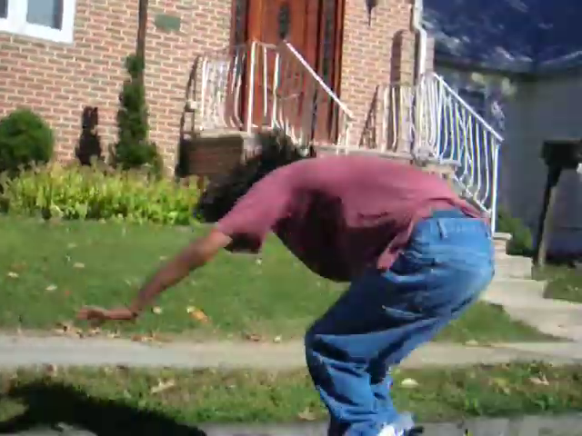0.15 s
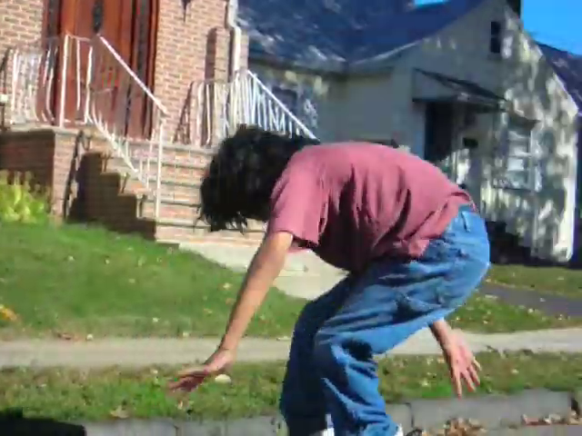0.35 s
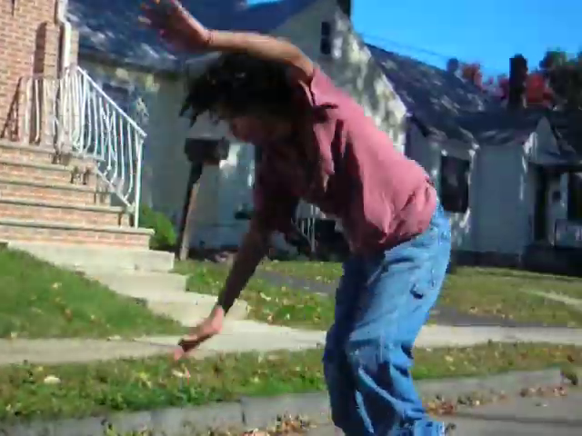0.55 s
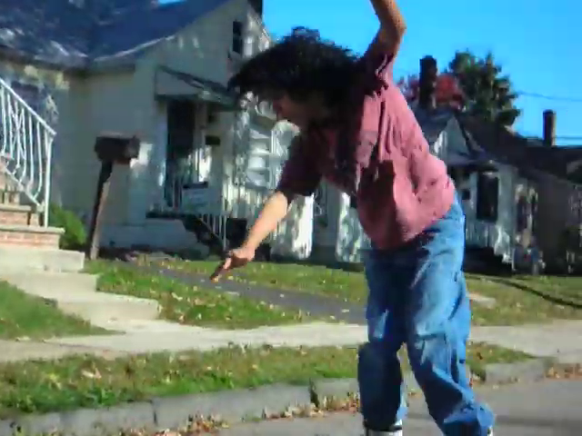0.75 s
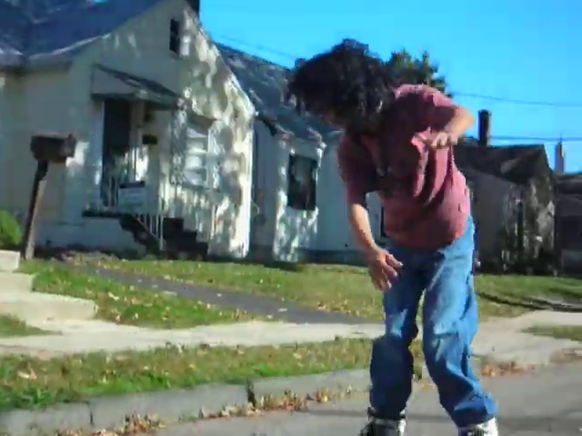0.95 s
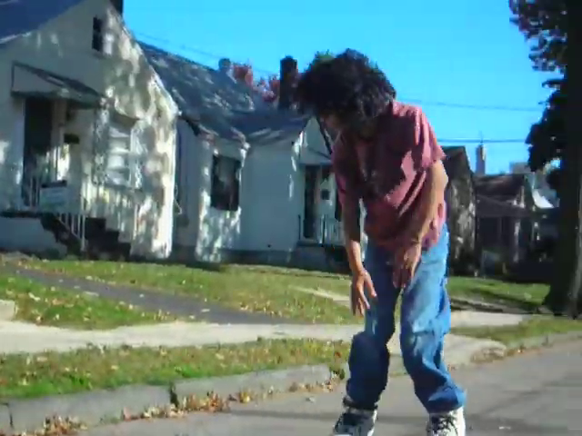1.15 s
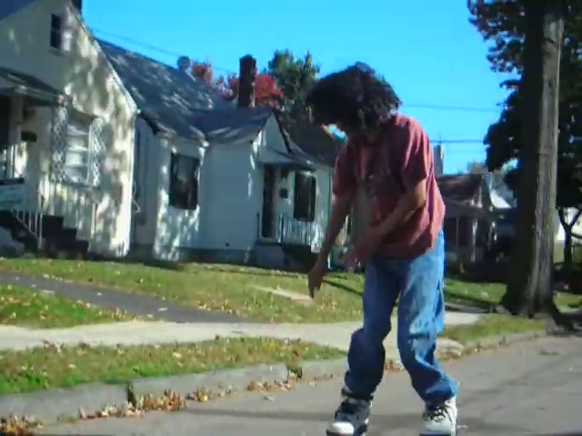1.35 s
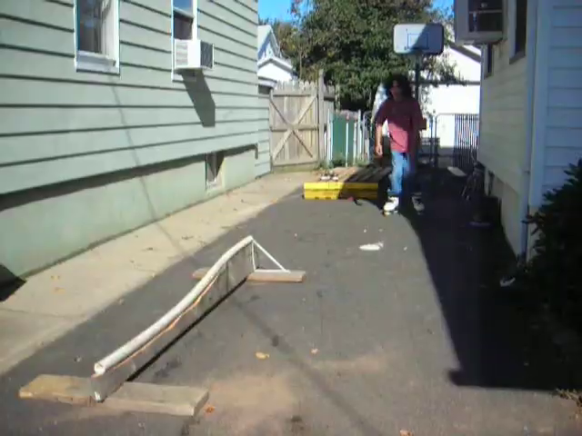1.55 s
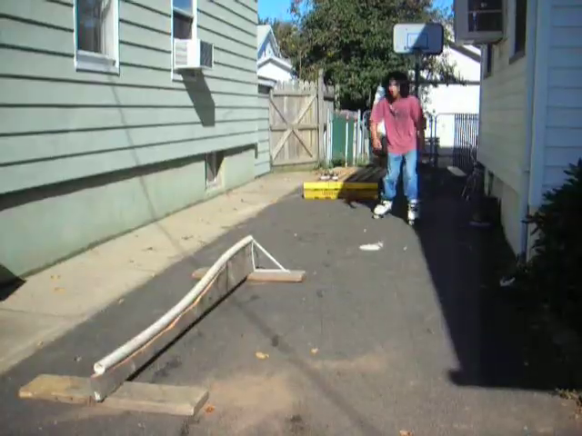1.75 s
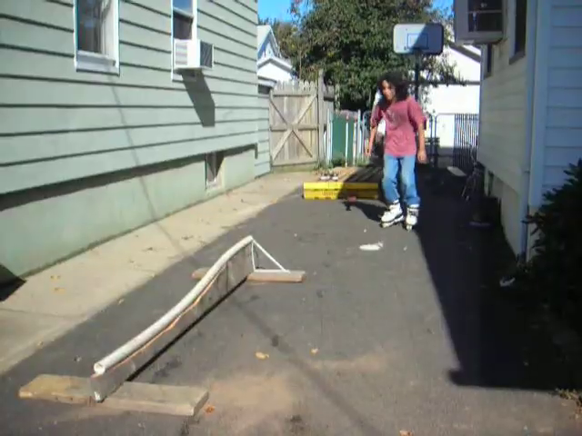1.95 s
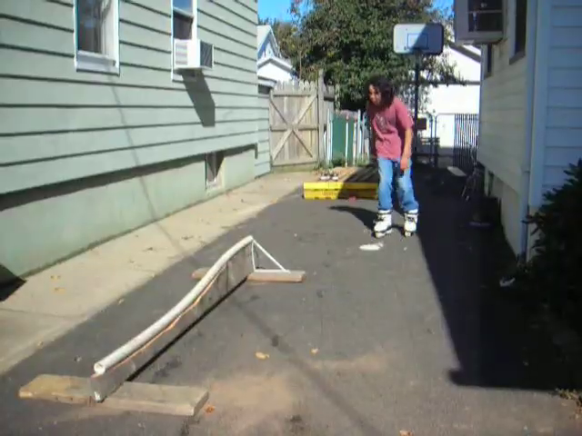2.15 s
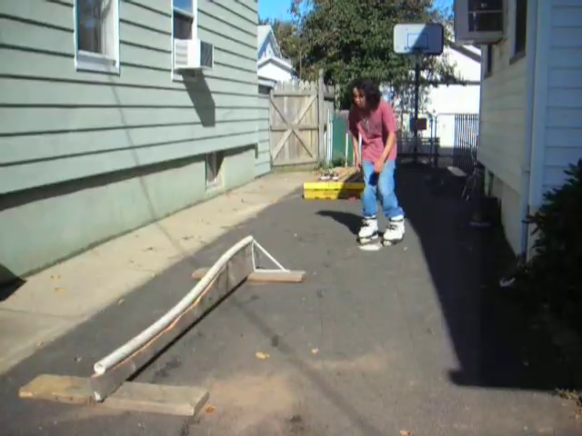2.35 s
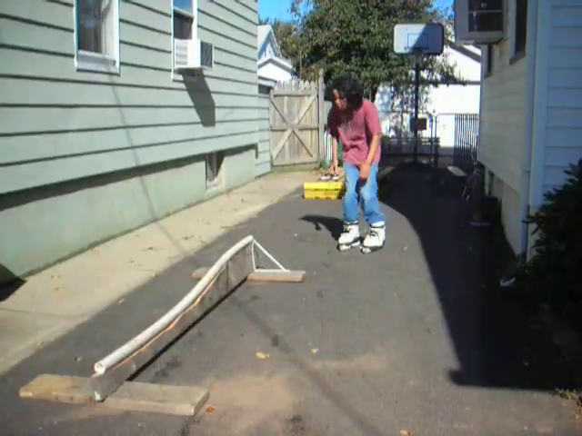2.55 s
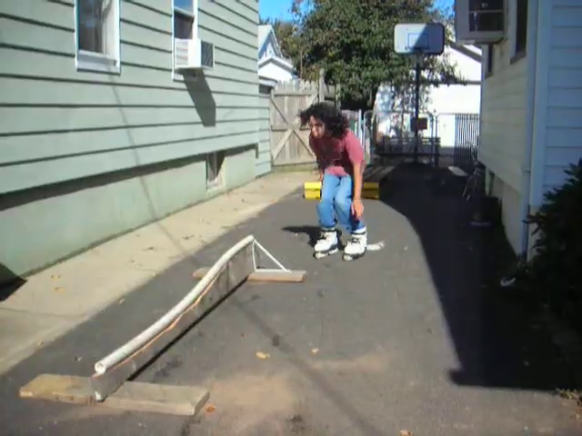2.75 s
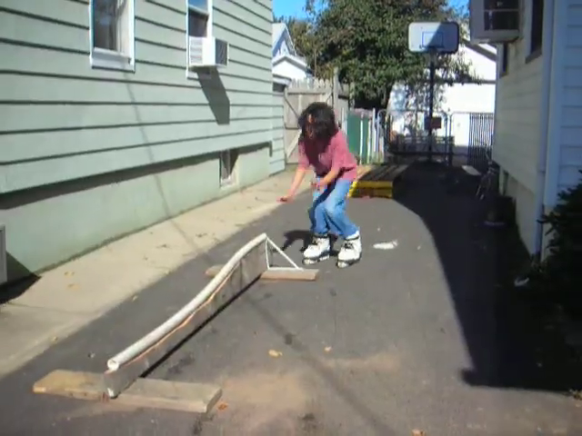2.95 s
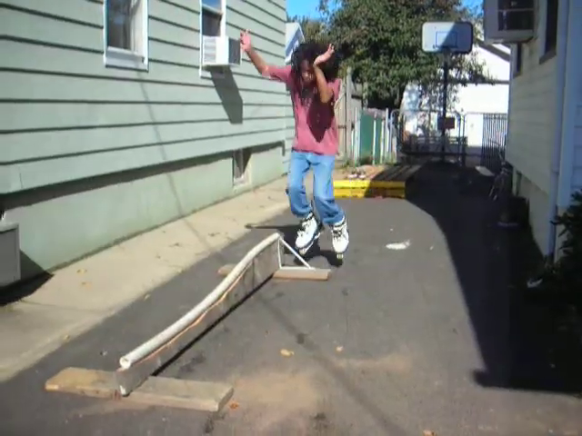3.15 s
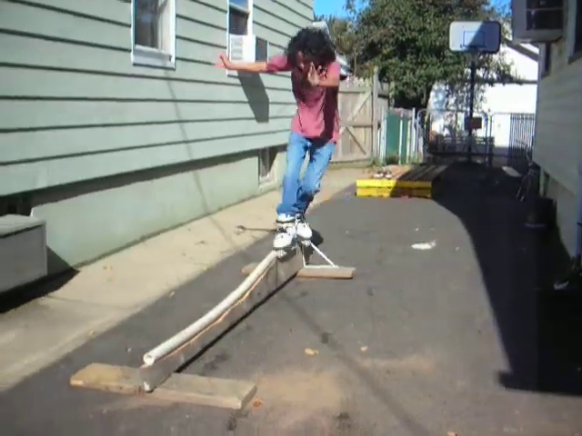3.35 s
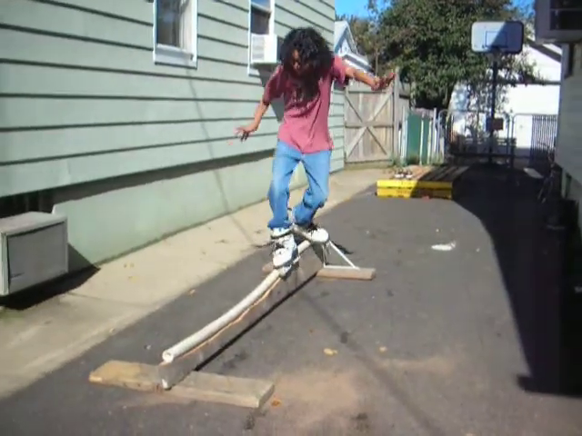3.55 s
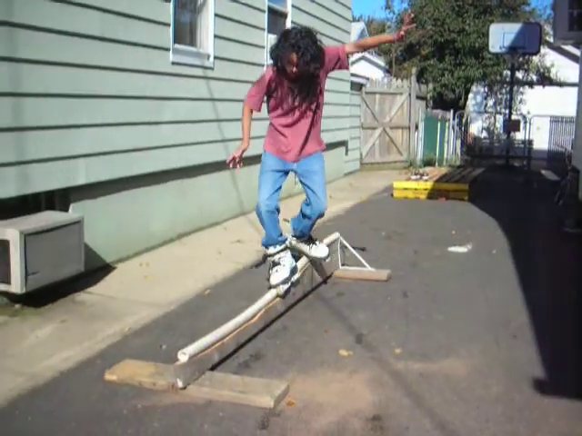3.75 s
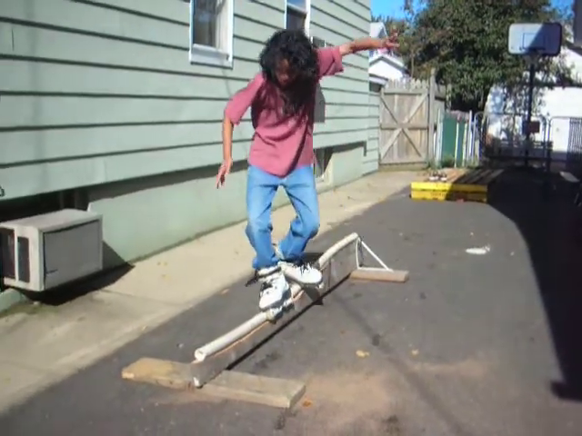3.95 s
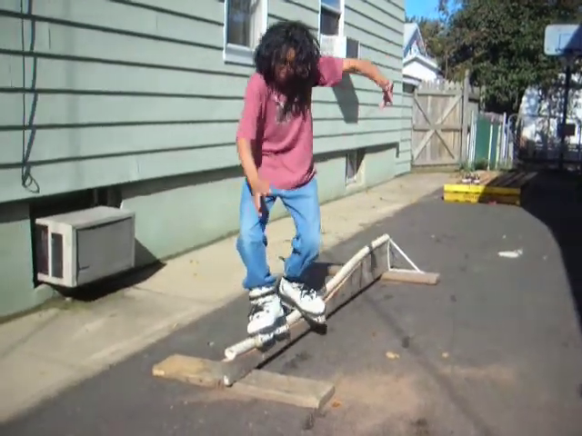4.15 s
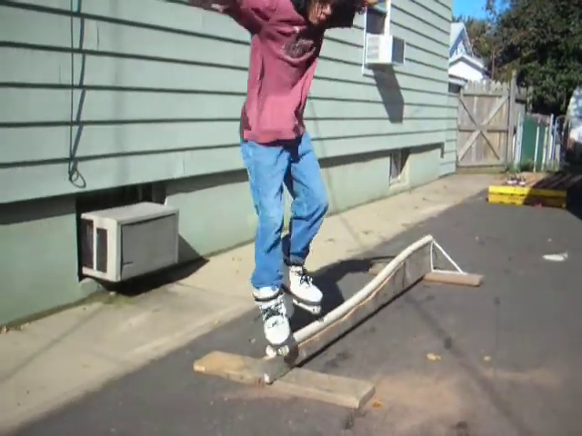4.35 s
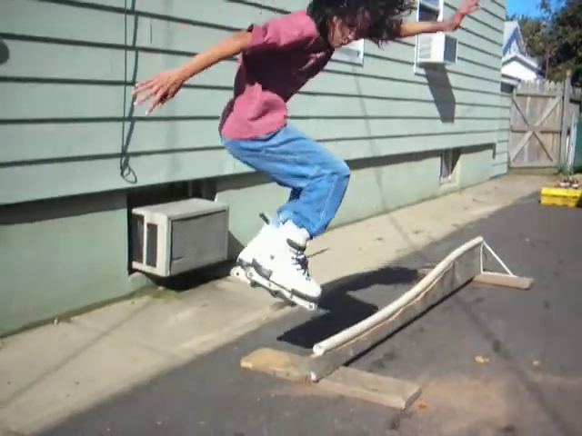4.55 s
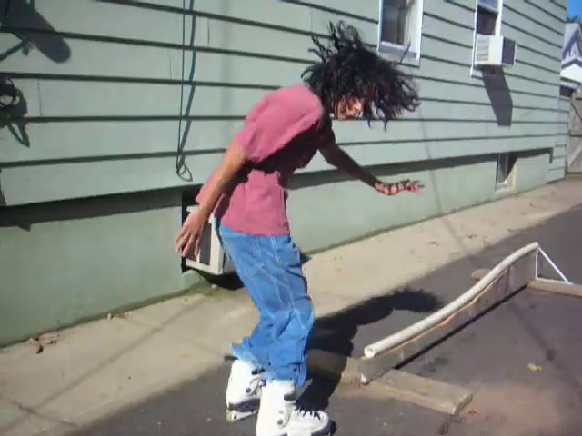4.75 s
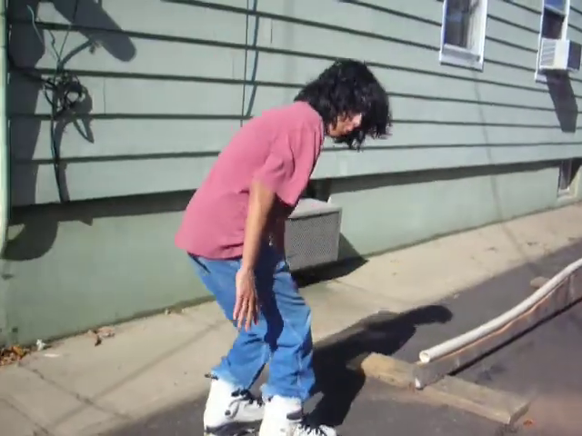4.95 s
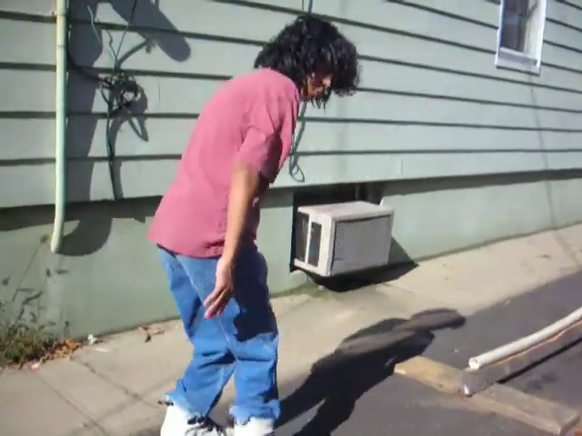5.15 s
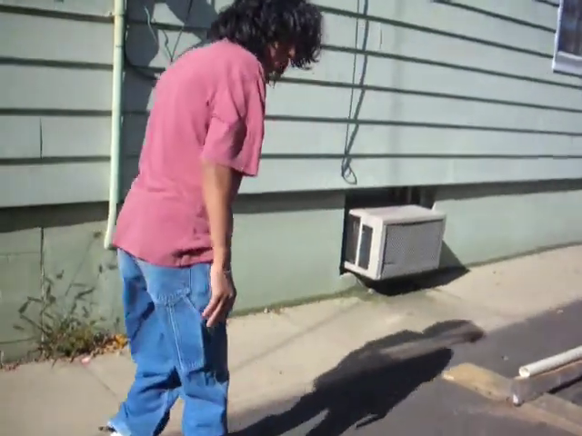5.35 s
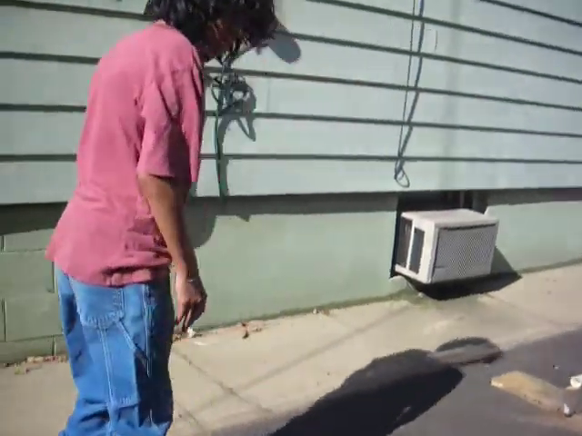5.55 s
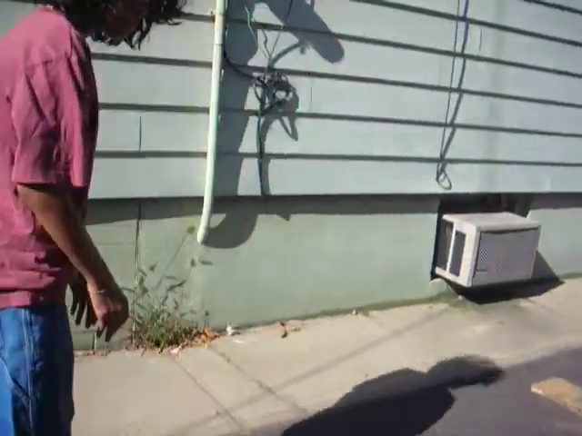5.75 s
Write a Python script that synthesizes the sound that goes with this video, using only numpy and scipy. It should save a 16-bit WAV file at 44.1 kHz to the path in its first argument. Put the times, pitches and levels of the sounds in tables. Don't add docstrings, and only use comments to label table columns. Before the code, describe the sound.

Inline skates hit a rough street at once with a tight, distorted clatter, then coast quietly with small stone ticks. From about 0.5 s the gritty rolling swells, with a sharp snap at 0.88 and a hard double clack at 1.08. It softens as the skater slows, with a dull knock near 1.25, a bright snap at 1.52 and a hard stop at 1.65. Around 1.7 the place changes to a paved yard between houses; wheels roll steadily closer until 3.1, then fade for the jump. A dense clack cluster at 3.32 starts a faint, hollow plastic scrape on a ringing rail, rising around 4.1. Snaps at 4.3 and 4.5 end it. After a short lull, a loud triple touchdown at 4.75 echoes off walls, and gritty rolling grows past the microphone, with a strong tick at 5.63. The sound is midrange, narrow and clipped on the blows.

```python
import sys
import numpy as np
from scipy import signal
from scipy.fft import rfft, irfft, next_fast_len
from scipy.io import wavfile
from scipy.ndimage import uniform_filter1d

SR = 44100
rng = np.random.default_rng(int(sys.argv[2]) if len(sys.argv) > 2 else 0)


def generate_wav(signal):
    frames = np.transpose(np.atleast_2d(signal))
    scaled = np.clip(frames, -1, 1) * 32767
    pcm = np.round(scaled).astype(np.int16)
    wavfile.write(sys.argv[1], SR, pcm)


def volts_from_decibels(level):
    exponent = np.asarray(level, float) / 20
    return 10 ** exponent


N = 259749

# frequency in Hz, gain in dB.
MIC_BAND = [(20, -22), (120, 1), (3300, 0), (3700, -6), (4000, -13), (4250, -19.5), (4500, -40),
            (4800, -73.5), (20000, -110)]
# frequency in Hz, gain in dB.
AIR_COLOUR = [(18, -37), (30, -15), (41, -20), (54, -33), (398, -30.5), (904, -24), (2790, -34),
              (4040, -32.5), (5250, -79.5), (8890, -120)]

# start in seconds, peak level in dB, ring in Hz, time to fade by 60 dB in seconds.
THUMPS = [(0.0587, -4, 408, 0.021), (0.534, -22.5, 200, 0.047), (0.98, -11, 104.9, 0.018),
          (1.076, -23, 93.3, 0.026), (1.2551, -1, 178.3, 0.0079), (1.519, -31.5, 88, 0.11),
          (2.183, -31, 207, .08), (2.381, -31, 193, 0.22), (3.327, -19, 330, 0.086),
          (4.312, -19, 350, 0.11), (4.744, -8.5, 322, 0.024)]
# start in seconds,
# peak level in dB, ring in Hz, crack level in dB, time to fade by 60 dB in seconds.
STREET_CLACKS = [
    (.043, -5, 1857, -1, .022),
    (.047, -3, 1150, -4, .035),
    (.06, -18, 1700, 0, .03),
    (1.0756, 5.5, 3090, -12, .011),
    (1.0784, 5, 2830, -11, .008),
    (1.2555, -14, 447, -6, .014),
    (1.523, -10, 3240, -4, .02),
    (1.53, -10.5, 2890, 2.5, .008),
    (1.641, -16, 591, 2.5, .026),
    (1.6513, 1.5, 360, -6, .016),
]
YARD_CLACKS = [(1.746, -11, 2510, -1.5, 0.018), (1.759, -17, 2170, -5.5, .03), (3.321, -4, 1060, -4, 0.043),
               (3.322, -2.5, 2900, -1, 0.017), (3.3245, 2.5, 2133, -5.5, 0.02),
               (3.331, -10.5, 754, -3, 0.11), (3.3619, -5.5, 2650, -10, 0.035),
               (3.366, -11, 2750, -5, 0.051), (3.376, -16, 633, 1, 0.057), (3.409, -12, 2590, 2, 0.041),
               (4.029, -28.5, 904, 4, 0.063), (4.075, -13, 772, -5.5, 0.064), (4.162, -25.5, 804, 2, .13),
               (4.3002, -6.5, 2454, -1, 0.016), (4.308, -9.5, 918, 0.3, 0.063),
               (4.504, -17.5, 1200, 3, 0.052), (4.512, -17, 880, -7, 0.017), (4.754, -10.5, 1110, 3, 0.019),
               (4.761, -15.5, 1680, -6, 0.064)]
# start in seconds,
# peak level in dB, ring in Hz, crack level in dB, time to fade by 60 dB in seconds.
SNAPS = [
    (.0418, -1.5, 730, -7, .016),
    (.0577, -4.5, 1700, -6, .02),
    (.8772, 6, 2900, -20, .008),
    (1.5215, 2.5, 3240, -14, .01),
    (4.3044, 4, 1600, -20, .009),
    (4.5006, 8, 826, -18, .017),
    (4.7394, 1.5, 1600, -9, .024),
    (4.7457, -.6, 900, -7, .02),
    (4.7519, 4.5, 1500, -14, .012),
]
# start in seconds, peak level in dB, ring in Hz.
STREET_TICKS = [(.099, -47, 1580), (.12, -18.5, 1690), (0.224, -28, 1660), (0.341, -24, 1200),
                (0.362, -19, 1640), (0.392, -11.5, 2790), (.411, -18, 1300), (0.43, -22, 1570),
                (.465, -18.5, 2200), (.494, -14, 1840), (0.541, -10.5, 1680), (0.553, -7, 2210),
                (0.908, -15, 2330), (0.948, -9, 1702), (.981, -4, 1775), (1.028, -18, 1705),
                (1.215, -13, 1700), (1.303, -20, 1630), (1.334, -14, 1695), (1.442, -3.5, 2500),
                (1.494, -8, 1714), (1.551, -22, 2080)]
YARD_TICKS = [(1.948, -20, 1790), (2.047, -18.5, 1720), (2.116, -19.5, 2280), (2.508, -13.5, 1610),
              (3.073, -28.5, 2350), (3.838, -26.5, 1230), (3.974, -31, 2570), (4.391, -24, 2395),
              (4.936, -22, 2650), (4.965, -25, 1310), (5.019, -24.5, 1350), (5.098, -22.5, 1690),
              (5.198, -13.5, 1370), (5.633, 0, 1740), (5.68, -20.5, 1650), (5.726, -10, 2850),
              (5.731, -9.5, 2110)]

# frequency in Hz, width in Hz, level in dB.
STREET = [
    [(1240, 490, -9.5), (1690, 190, 8), (2100, 150, -7)],
    [(119, 160, -8.5), (200, 150, 5.5), (330, 410, 1)],
    [(545, 227, -5.5), (870, 140, 1.2), (1140, 410, 0.6)],
    [(2350, 410, -0.5), (2750, 380, -1), (3050, 450, 0), (3440, 1100, -5.5)],
]
RUN_UP = [
    [(1310, 140, -13.5), (1680, 95, 4), (1870, 860, -4.5)],
    [(110, 180, -15.5), (187, 26, 1), (332, 31, -1)],
    [(576, 256, -4), (840, 190, -2.3), (1172, 183, -1)],
    [(2193, 240, -5), (2633, 740, 2), (3050, 730, 0.5), (4040, 1400, -9)],
]
RUN_OUT = [
    [(1350, 50, -8), (1682, 170, 1), (2015, 430, -6.2)],
    [(132, 100, -11.5), (246, 114, -4), (358, 104, -5)],
    [(723, 160, -6), (834, 49, 1.5), (1200, 400, -3)],
    [(2320, 910, 8.5), (2900, 2140, 5.5), (3280, 280, -17), (3800, 420, -2.5)],
]
# wheel ring, rumble, frames and grit, in dB.
STREET_MIX = (-4, -10, -8.5, -5)
SLOWING_MIX = (-4.5, -11, -9, -2.5)
RUN_UP_MIX = (-2.5, -12.5, -8, -3.5)
RUN_OUT_MIX = (-5, -13.5, -4, -8)
ROLL_EXTRA = (-0.033, -.1, -.15, 0.18)

# time in seconds, level in dB.
BEFORE_LANDING = [(0.0, -34), (0.018, -41.5)]
COASTING = [(0.078, -39.5), (0.136, -29), (0.212, -42), (0.22, -36), (0.402, -31.5), (0.44, -29.5)]
ROUGH_PATCH = [(0.472, -26.5), (0.55, -15), (0.578, -19.5), (0.736, -14.5), (0.754, -18.5), (0.838, -16),
               (0.936, -23), (1.053, -18)]
SLOWING = [(1.092, -30), (1.096, -37.5), (1.192, -32.5), (1.262, -24), (1.286, -27.5), (1.446, -22.5),
           (1.478, -29.5), (1.51, -24.5)]
STOPPING = [
    [(1.54, -29), (1.602, -27), (1.62, -32)],
    [(1.672, -27.5), (1.7, -34), (1.722, -27.5)],
]
PUSH_OFF = [(1.755, -22), (1.937, -29), (1.953, -24), (1.985, -30), (2.093, -28)]
APPROACH = [(2.126, -21.5), (2.596, -21), (2.618, -23), (2.834, -20), (3.062, -24.5), (3.076, -22),
            (3.114, -33), (3.274, -42), (3.298, -39)]
TOUCH_DOWN = [(4.79, -27.5), (4.878, -45), (5.032, -33.5), (5.088, -40), (5.114, -28.5), (5.174, -31.5)]
ROLL_PAST = [(5.206, -22.5), (5.284, -21), (5.306, -23.5), (5.436, -18), (5.57, -14), (5.612, -19.5),
             (5.848, -13), (5.89, -19.5)]
STREET_STEADY = [1.2, .9, .65, .45, .9, .9]
RUN_UP_STEADY = [.9, 1.1]
RUN_OUT_STEADY = [.7, .8]

# frequency in Hz, width in Hz, level in dB.
PLANK = [(642, 140, -3.5), (856, 200, -2.5), (1270, 100, -5)]
RAIL_LOW = [(200, 230, -14), (354, 210, -6.5)]
RAIL_MIDDLE = [(1300, 470, -5), (1700, 670, 4), (2210, 400, -4)]
RAIL_TOP = [(2260, 250, -3), (2650, 440, -1.5), (3260, 600, -1.5), (3580, 670, -2.5)]
# plank, low, middle and top scrape, in dB.
RAIL_MIX = (-2, -13, -7, -3.5)
RAIL_EXTRA = (0.12, -0.13, 0.086, -0.015)
# time in seconds, level in dB.
LOCK_ON = [(3.338, -14), (3.356, -25), (3.366, -14), (3.395, -18.5), (3.412, -18), (3.43, -30.5)]
RAIL_RINGS = [(3.462, -32.5), (3.542, -33.5), (3.558, -38.5), (3.644, -42), (3.66, -39)]
SLIDE = [(3.69, -48), (3.824, -37.5), (3.83, -38.5), (4.062, -27.5), (4.078, -18.5), (4.146, -30),
         (4.162, -26.5), (4.278, -31)]
SLIDE_END = [(4.335, -21), (4.355, -23), (4.391, -23.5), (4.476, -34.5)]
AIRBORNE = [(4.535, -38.5), (4.601, -42), (4.714, -80)]


def unit(x):
    return x / np.sqrt(np.mean(x ** 2))


def colour(x, points):
    size = next_fast_len(N + 4096)
    hz, db = np.transpose(points)
    bins_hz = np.arange(size // 2 + 1) * SR / size
    gain = volts_from_decibels(np.interp(np.log(bins_hz + 1), np.log(hz), db))
    return irfft(rfft(x, size) * gain, size)[:N]


def band(x, low_hz, high_hz):
    return signal.sosfilt(signal.butter(2, (low_hz, high_hz), "band", fs=SR, output="sos"), x)


def outdoor_air(clacks):
    recent = signal.lfilter([1], [1, -np.exp(-1 / (.25 * SR))], clacks ** 2)
    level_db = -42 - 7 * recent / recent.max()
    return volts_from_decibels(level_db) * unit(colour(rng.standard_normal(N), AIR_COLOUR))


def echo(x, t60, db, first_s):
    t = np.arange(SR // 2) / SR
    tail = rng.standard_normal(len(t)) * volts_from_decibels(-60 * t / t60) * (t > first_s)
    return volts_from_decibels(db) * signal.fftconvolve(x, tail / np.sqrt(np.sum(tail ** 2)))[:N]


def thumps():
    out, t = np.zeros(N + 8192), np.arange(8192) / SR
    for s, db, hz, t60 in THUMPS:
        out[int(s * SR):][:8192] += volts_from_decibels(db - 60 * t / t60) * np.sin(2 * np.pi * hz * t)
    return out[:N]


def blows(rows, rise_s, dull_db):
    out, t = np.zeros(N + 8192), np.arange(8192) / SR
    noise = rng.standard_normal((len(rows), 8192))
    dull_noise = unit(band(noise, 450, 1200))
    bright_noise = unit(band(noise, 1200, 4500))
    for (s, db, hz, crack_db, t60), dull, bright in zip(rows, dull_noise, bright_noise):
        fade = (1 - np.exp(-t / rise_s)) * volts_from_decibels(db - 60 * t / t60)
        tilt = volts_from_decibels(-0.5 * np.log2(hz / 1500) / 2)
        crack = volts_from_decibels(crack_db) * (volts_from_decibels(dull_db) * tilt * dull + bright / tilt)
        tone = volts_from_decibels(-30 * t / t60) * np.sin(2 * np.pi * hz * t)
        out[int(s * SR):][:8192] += fade * (crack - tone)
    return out[:N]


def clacks_and_snaps():
    clacks = blows(STREET_CLACKS + YARD_CLACKS + SNAPS, .0004, -3.5)
    return signal.sosfilt(signal.butter(2, 200, "high", fs=SR, output="sos"), clacks)


def stone_ticks():
    stones = [(s, db, hz, -0.5, 24 / hz) for s, db, hz in STREET_TICKS + YARD_TICKS]
    return blows(stones, .0003, -3)


def ring(x, modes):
    total = 0
    for k, (hz, width, db) in enumerate(modes):
        b, a = signal.iirpeak(hz, hz / width, fs=SR)
        total = total + (-1) ** k * volts_from_decibels(db) * signal.lfilter(b, a, x)
    return unit(total)


def gains(rows, mix_db, extra):
    usual_db = -22.5
    s, db = np.transpose(rows)
    t = np.arange(N) / SR
    sounding = np.clip(np.minimum(t - s[0] + .009, s[-1] + .023 - t) / .002, 0, 1)
    level = np.interp(t, s, db)
    return [sounding * volts_from_decibels(level + m + e * (level - usual_db)) for m, e in zip(mix_db, extra)]


def drift():
    swell_db, steps_per_s = 1.5, 9.
    steps = rng.standard_normal((200, 4)).T
    at = np.arange(N) / SR * steps_per_s
    return volts_from_decibels([swell_db * np.interp(at, np.arange(len(s)), s) for s in steps])


def contact(stones, stone_db, bumps, uneven, bump_db, bump_s, steady):
    draw = rng.random((2, N))
    chatter = np.clip(rng.standard_normal((2, 2000)), -2, 2)
    size = volts_from_decibels(stone_db * np.minimum(-np.log(draw[1]), 3))
    grit = (draw[0] < stones / SR) * size * rng.standard_normal(N)
    at = np.cumsum(np.exp(uneven * chatter[0]) * SR / bumps).astype(int)
    kicks = np.zeros(N)
    kicks[at[at < N]] = volts_from_decibels(bump_db * chatter[1][at < N])
    bursts = signal.lfilter([1], [1, -np.exp(-1 / (bump_s * SR))], kicks)
    return grit * (steady + unit(uniform_filter1d(bursts, size=30))) / (steady + 1)


def wheels():
    places = ((STREET, STREET_MIX, (BEFORE_LANDING, COASTING, ROUGH_PATCH)),
              (STREET, SLOWING_MIX, (SLOWING, *STOPPING)),
              (RUN_UP, RUN_UP_MIX, (PUSH_OFF, APPROACH)),
              (RUN_OUT, RUN_OUT_MIX, (TOUCH_DOWN, ROLL_PAST)))
    ends = [stretch[k][0] for place in places for stretch in place[-1] for k in (0, -1)]
    shares = np.repeat(STREET_STEADY + RUN_UP_STEADY + RUN_OUT_STEADY, 2)
    steady = np.interp(np.arange(N) / SR, ends, shares)
    sharp = contact(9000., 1.2, 90., .3, 2.6, .0038, steady)
    soft = contact(3000., 0.37, 66.0, .6, 2.3, 0.084, 0.65)
    drives = (sharp, soft, unit(sharp) + 2.2 * unit(soft), sharp)
    out, wander = 0, drift()
    for skates, mix_db, stretches in places:
        parts = [ring(drive, modes) for drive, modes in zip(drives, skates)]
        levels = np.sum([gains(s, mix_db, ROLL_EXTRA) for s in stretches], axis=0)
        out = out + np.sum(levels * wander * parts, axis=0)
    return out


def slide():
    scrape = contact(9000., 1.2, 80., 0.95, 5., .007, 2.8)
    parts = [ring(scrape, modes) for modes in (PLANK, RAIL_LOW, RAIL_MIDDLE, RAIL_TOP)]
    stretches = (LOCK_ON, RAIL_RINGS, SLIDE, SLIDE_END, AIRBORNE)
    levels = np.sum([gains(s, RAIL_MIX, RAIL_EXTRA) for s in stretches], axis=0)
    return np.sum(levels * drift() * parts, axis=0)


def scene():
    clacks, ticks, knocks = clacks_and_snaps(), stone_ticks(), thumps()
    hits = clacks + ticks + knocks
    in_yard = np.arange(N) > 1.7 * SR
    street_walls = echo(hits * ~in_yard, 0.26, -15.5, 0.01)
    yard_walls = echo(hits * in_yard, 0.25, -12, .008)
    air = outdoor_air(clacks)
    give = .55
    rolling = give * np.tanh((wheels() + slide() + ticks) / give)
    return (rolling + clacks + knocks + street_walls + yard_walls + air)[None]


def low_pass(x):
    return signal.sosfilt(signal.butter(12, 16085, fs=SR, output="sos"), x)


def record(dry):
    offset, ceiling = -.0305, .71
    heard = np.clip(colour(dry[0], MIC_BAND) + offset, -ceiling, ceiling)
    return low_pass(heard[None])


dry = scene()
out = record(dry)
generate_wav(out)
```